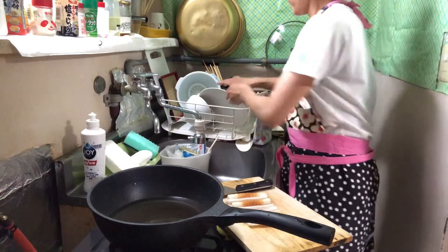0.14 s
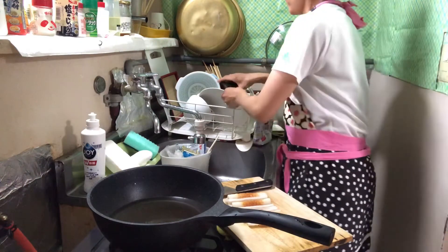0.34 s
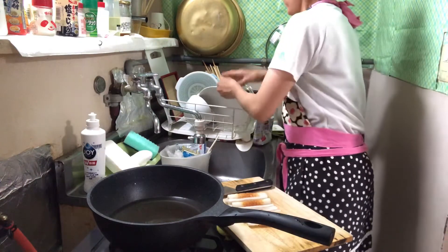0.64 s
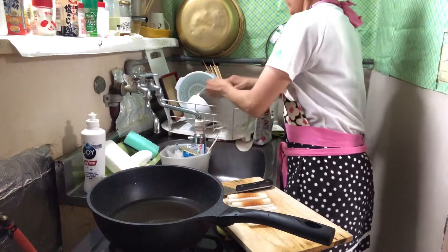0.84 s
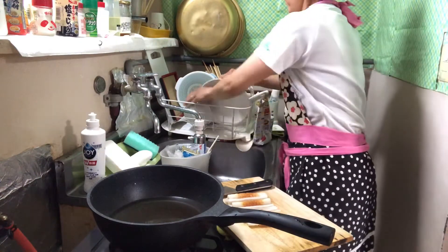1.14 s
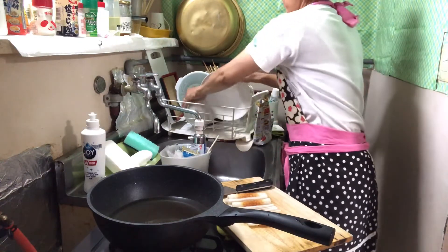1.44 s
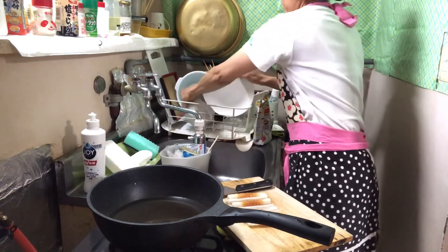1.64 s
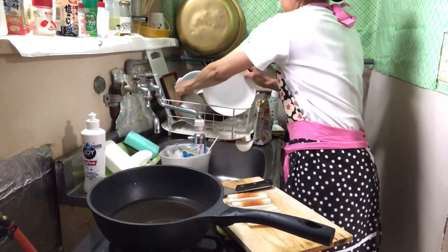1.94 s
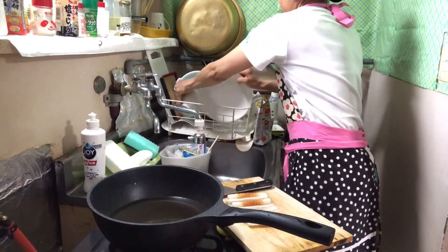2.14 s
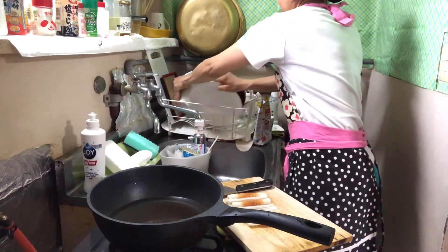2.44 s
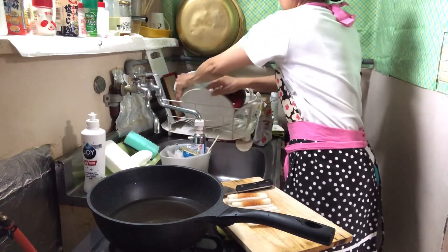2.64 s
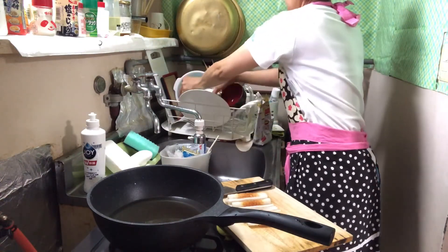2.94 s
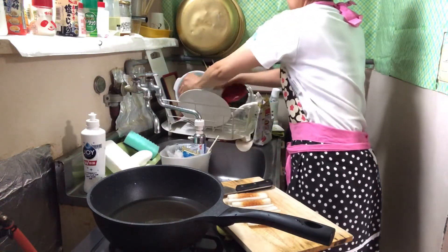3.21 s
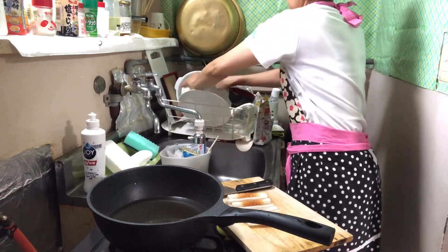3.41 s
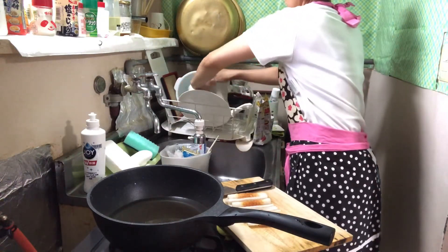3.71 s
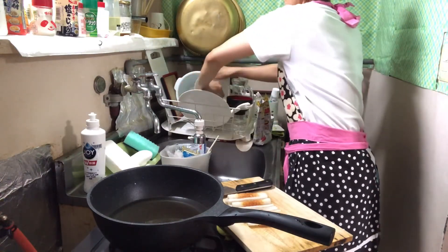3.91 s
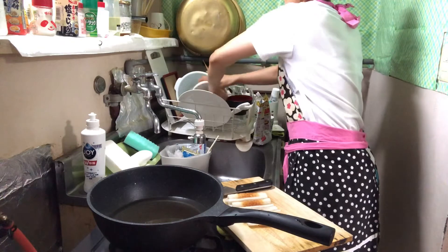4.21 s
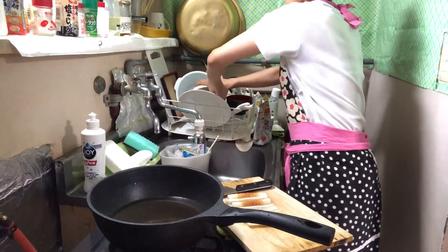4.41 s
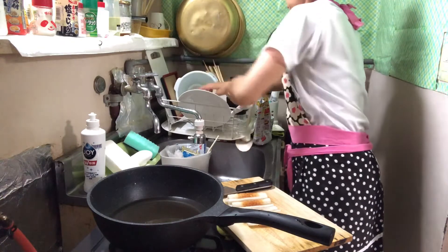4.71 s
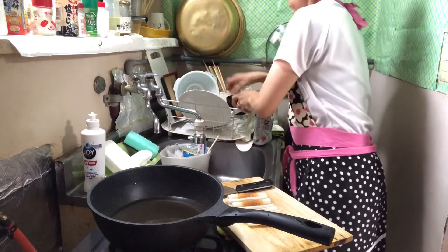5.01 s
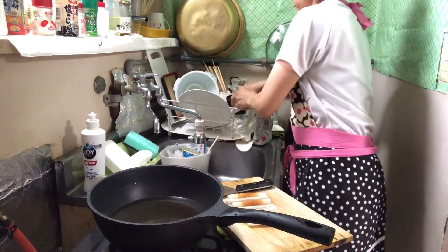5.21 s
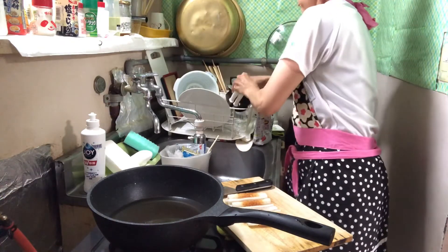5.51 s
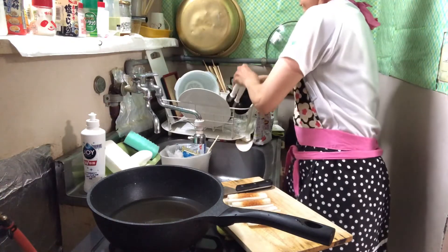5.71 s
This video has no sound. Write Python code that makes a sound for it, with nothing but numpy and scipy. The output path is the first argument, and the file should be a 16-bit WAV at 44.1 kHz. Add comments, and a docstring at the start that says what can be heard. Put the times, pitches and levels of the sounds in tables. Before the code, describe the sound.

Crockery clatters and clinks in a wire drying rack as someone rummages, with rim scrapes, sink thuds and a faint kitchen hum.

```python
"""A faint wavering hum and soft room noise, then knocks: someone rummages through a wire drying rack.
Each knock rings the struck piece (decaying sine modes) and rattles the stack (a noisy chord of chance modes).
Rims scrape between the knocks (random slips through broad resonances), catching now and then.
Knocks and bumps thud on the steel sink (resonant noise); close kitchen walls smear knocks and scrapes."""
import sys
import numpy as np
from scipy import signal
from scipy.fft import rfft, irfft, next_fast_len
from scipy.io import wavfile
from scipy.ndimage import uniform_filter1d

SR = 44100
rng = np.random.default_rng(int(sys.argv[2]) if len(sys.argv) > 2 else 0)


def file_out(sig):
    """Save sig as 16-bit WAV at sys.argv[1]."""
    # one column per channel
    cols = np.atleast_2d(sig).T
    # limit, then scale
    lim = np.clip(cols, -1, 1)
    pcm = np.round(lim * 32767).astype(np.int16)
    wavfile.write(sys.argv[1], SR, pcm)


N = 258008
TIME = np.arange(N) / SR
AGE = np.arange(24000) / SR  # seconds since a contact
BODY_HZ, EDGE_HZ, TOP_HZ = 1400, 6000, 15900
STROKE_ATTACK_S, STROKE_RELEASE_T60_S = 0.018, 0.18
SOFT_TOUCH = 0.07  # dB of longer build-up for each dB that a knock is lighter
CHOKE_S = 0.11  # a piece struck again within about this time is pressed on its neighbour and rings less
# how the contact point favours mode clusters [dB], cluster width [Hz]; single modes, +/- this [dB]
PATCHY_DB, PATCH_HZ, FAVOUR_DB = 3.2, 130, 7
STACK_LAG_S = .0022  # time for a shock to spread through the stack

# room noise spectrum: (frequency [Hz], relative level per Hz [dB])
AIR = [(24, -58.5), (40, -17), (75, -14.5), (109, -4.5), (144, -11), (180, -3), (231, -14), (455, -9.5),
       (751, -24.5), (1020, -20.5), (1440, -27.5), (4800, -35), (16000, -53.5)]

# knocks on each kind of piece; body (below 1.4 kHz) and edge (above 6 kHz) are relative to the clink between:
# (time [s], relative level [dB], body [dB], edge [dB], rattle t60 [s])
CUP_KNOCKS = [(.1288, -44.5, -8, -20, 0.1), (.4594, -37.5, 4, -6.5, 0.27), (.4969, -25, -2, -10, 0.11),
              (.6674, -23.5, -3.5, -13.5, 0.38), (.6854, -23.5, 4.5, -14, 0.21),
              (.7196, -11.5, -4.5, -18, 0.32), (.7454, -9, -13.5, -11.5, 0.091), (.832, -25, -6, -32, .37),
              (.8716, -19, -4, -16, 0.3), (.8943, -13, -7, -16.5, 0.18), (2.4992, -13, -5.5, -5.5, 0.35),
              (2.526, -9.5, -5.5, -16, 0.1), (2.6685, -3.5, -19, -6, 0.16), (2.725, 0, -12.5, -8.5, .23),
              (3.3965, -10, -4.5, -10.5, 0.29), (3.4092, 1, -11, -10.5, 0.15), (3.484, 1, -11, -19, 0.1),
              (3.4983, -3, -3, -10.5, .16), (3.5961, -18.5, -2, -15.5, 0.1),
              (3.7409, -8, -6.5, -17.5, 0.091), (3.8052, -28.5, -24, -9.5, 0.21),
              (4.0097, -20.5, -2, -29, 0.11), (4.0492, -21, -7, -17, 0.29),
              (4.2583, -13.5, -14.5, -20.5, 0.15), (4.3313, -16, -9.5, -13.5, 0.52),
              (4.7184, -23.5, -16, -6.5, 0.25), (5.2722, -28.5, -12, -16.5, 0.27),
              (5.3552, -38, -15, -5, 0.22), (5.6342, -20.5, 6, -12, 0.19), (5.6474, -19, 9, -12, 0.079)]
RACK_KNOCKS = [(.6016, -35.5, 0.5, -21, 0.2), (1.0654, -34, 2, -12, 0.065), (1.0751, -23, 7.5, -27, .21),
               (1.0952, -21, -16, -11.5, 0.13), (1.1994, -40.5, 13, -15, 0.37),
               (1.3094, -48.5, 21.5, -26, 0.061), (1.49, -23.5, 9.5, -23, 0.023),
               (1.5369, -30, 8.5, -34, 0.34), (2.3492, -32.5, -1.5, -22, 0.45),
               (2.9204, -20, -3, -18.5, 0.3), (3.036, -15, -3.5, -22, 0.12),
               (3.2623, -30.5, -3, -7.5, 0.58), (3.3074, -27.5, -1, -18, 0.15),
               (3.8695, -24.5, -2.5, -40, 0.08), (3.945, -39, 11, -34, 0.46), (4.5676, -17, -10, -17, 0.18)]
PLATE_KNOCKS = [(1.2436, -31, 12, -29, 0.21), (1.2734, -27.5, 7.5, -21, 0.049),
                (1.4242, -18.5, 1.5, -20, 0.28), (1.5989, -2, -13.5, -10.5, 0.14),
                (1.6551, -7.5, -14, -13, 0.15), (1.6721, -14, -13, -16, 0.082),
                (1.7124, -16.5, -7.5, -10.5, 0.82), (1.7606, -2.5, -5, -13, 0.088),
                (1.7893, 1, -13, -19.5, 0.09), (1.805, -4, -6, -12, 0.17), (1.934, -24, -9.5, -8, .2),
                (1.9565, -10, -13, -11, 0.13), (2.1163, -29, 0.5, -18, 0.56),
                (2.148, -15, -10.5, -14, 0.15), (2.158, -4.5, -6.5, -11, 0.052),
                (2.174, -16, 0.5, -12, 0.034), (3.1294, -21, -5, -10, 0.34)]
GLASS_KNOCKS = [(3.5961, -16, 1.6, -12, .07)]
BOWL_KNOCKS = [(4.3554, -12.5, -1.5, -24.5, 0.19), (4.366, -5.5, -13.5, -18, 0.44),
               (4.3829, -4.5, -3.5, -2.5, 0.16), (4.3968, -2.5, -25, -6, 0.1),
               (4.4144, -6.5, -23.5, -11.5, 0.22), (4.4354, -1, -8, -11.5, 0.17),
               (4.452, -14, -5, -12, 0.06), (4.5118, -16, -3.5, -18, 0.14)]
DISH_KNOCKS = [(4.5851, -5.5, -2.5, -15, 0.18), (4.6079, -12.5, -1, -22, 0.16),
               (5.0498, -18, 2.5, -21, 0.2), (5.7249, -26, 3, -12, 0.41), (5.7956, -13.5, -2, -16.5, 0.15)]
SAUCER_KNOCKS = [(5.2445, -36.5, 5, -17, 0.21), (5.3314, -29.5, -6, -20, 0.35),
                 (5.4274, -28.5, 7, -28, 0.72), (5.4615, -19, -4, -19, 0.18), (5.502, -22.5, 5, -17, .07),
                 (5.5294, -21.5, -18, -14, 0.092), (5.5727, -23.5, 2, -15, 0.38),
                 (5.7555, -24.5, 9.5, -13, 0.12)]

# ringing modes of each piece: (frequency [Hz], relative level [dB], t60 [s])
CUP = [(1003, 6, 0.17), (1216.5, 3.5, 0.1), (1750, 4, 0.13), (2919, 17, 0.028), (3665, 10.5, 0.051),
       (4060, -7, 0.17), (4080, -9, 0.15), (4610, -7, 0.053), (4830, -1.5, 0.095), (5363, 6, 0.029),
       (6700, -10, 0.059), (7360, -8, 0.1), (8470, -29, .14), (9120, -19.5, 0.15), (9600, -16, 0.05),
       (11300, -25.5, 0.12), (12400, -22, 0.15), (13840, -22.5, .2)]
RACK = [(646, -16, 0.17), (790, -13, 0.21), (963, -9, 0.15), (1004, 2.5, 0.099), (1032, -7.5, 0.067),
        (1099.5, 0, 0.14), (1250, -5.5, 0.071), (1780, -8.5, 0.11), (1874, -1, 0.031), (2025, -22.5, 0.5),
        (2950, -8, 0.14), (4080, -10, 0.048), (5080, -23, 0.086), (6480, -40, 0.056), (7020, -19.5, 0.19),
        (9950, -30, 0.41), (11300, -32.5, 0.17)]
PLATE = [(595.6, -1, 0.097), (772, -9.5, 0.21), (1027.4, 6, 0.063), (1769, -4.5, 0.11), (2957, -0.5, 0.082),
         (3366, 1, 0.039), (4530, -15, .11), (4610, -1, .07), (6010, 3, 0.044), (6630, -8, 0.089),
         (7470, -5, .11), (9250, -17, .12), (9717, -24, 0.097), (11560, -29, .1), (13100, -27, 0.11)]
GLASS = [(576, -5.5, .09), (1166, 1, 0.11), (1820, -19, 0.16), (3250, 0, 0.07), (5750, -25, .2),
         (7100, -17, 0.22), (9800, -19, .12), (11900, -20, .12), (14260, -12, .12)]
BOWL = [(1050, -2, .22), (2928, 0, .24), (4578, -11, .25), (5216, 0, .17), (7472, -16, .18),
        (7957, -6, .17), (9232, -14, .18), (11267, -23, .15), (11854, -19, .14), (13049, -18, .15),
        (13948, -19, .15)]
DISH = [(965, -4, 0.058), (1039, 1, 0.063), (1176, -2.5, 0.071), (1681, -2, 0.076), (1902, -3.5, 0.05),
        (3180, -5, 0.053), (4760, -16, 0.23), (6385, -26, 0.09), (7220, -16, 0.25), (9940, -18, 0.16),
        (11920, -16, 0.18), (12560, -27, .15)]
SAUCER = [(738, -2, 0.16), (1030, 9, 0.055), (1138, 12.5, 0.061), (1250, 4.5, 0.098), (1665, 3, 0.046),
          (2932, -10, 0.26), (3460, -2.5, 0.1), (3397, -22, 0.11), (4930, -5, 0.41), (6196, -29, .15),
          (6988, -25, 0.18), (7370, -11, 0.31), (10200, -20, 0.14), (12565, -25, .18)]

# broad resonances of the stacked crockery: (frequency [Hz], width [Hz], relative level [dB])
STACK = [(510, 133, -1.5), (555, 22, -2), (868, 650, -1.5), (1070, 300, -2.5), (1225, 63, -17.5),
         (1940, 454, 0.5), (2500, 140, -7.5), (3013, 470, -0.5), (3376, 260, -8.5), (3920, 170, -4.5),
         (4560, 650, -5.5), (5130, 1030, -9.5), (6120, 480, -12.5), (6775, 220, -6), (7890, 450, -14),
         (10030, 970, -20.5), (11520, 180, -19), (13040, 450, -23.5), (15340, 2100, -31)]
# resonances of the steel sink: (frequency [Hz], width [Hz], relative level [dB])
SINK = [(60, 29, -11), (86.6, 30, -12.5), (125, 63, -12.5), (192, 73, -4.5), (268, 7.2, 3.5),
        (328, 110, -4.5), (397.7, 12.3, 10), (488, 75, -1), (580, 56, -3.5)]
# plate rubbed while fingers damp it: (frequency [Hz], width [Hz], relative level [dB])
PLATE_RUB = [(585, 47, 4.5), (816, 220, -11.5), (1010, 144, -4), (1188, 190, -9), (1825, 810, -8.5),
             (2350, 300, -16), (2930, 92, -17), (3180, 180, -9), (4530, 760, -16), (6000, 200, -12.5),
             (6970, 360, -20.5), (7100, 1000, -22.5), (9500, 1100, -32.5), (13100, 3500, -35)]
# saucer rubbed while fingers damp it: (frequency [Hz], width [Hz], relative level [dB])
SAUCER_RUB = [(413, 140, -11), (706, 77, -9), (1090, 390, -15), (1770, 780, -19), (2900, 220, -12),
              (3500, 2400, -5.5), (5100, 220, 1), (6230, 800, -21), (7700, 760, -6.5), (10300, 1500, -30),
              (13000, 3500, -29)]

# one rim sliding over another: (start [s], length [s], relative level [dB], relative gritty treble [dB])
PLATE_STROKES = [(.69, 0.25, -25, -31.5), (1.23, .27, -25, -42), (1.61, 0.45, -26, -39),
                 (2.5, 0.32, -29.5, -38.5), (2.96, .15, -30, -38.5), (3.28, 0.33, -28.5, -40),
                 (3.66, 0.5, -44.5, -46), (4.33, 0.093, -38.5, -19), (4.75, 0.074, -33.5, -43)]
SAUCER_STROKES = [(5.36, 0.24, -30, -44.5), (5.62, 0.05, -42, -17.5), (5.7, 0.2, -31.5, -42)]
# the whole rack rocks and lands on the sink: (time [s], relative level [dB])
BUMPS = [(.898, -30.5), (1.088, -29.5), (2.521, -23), (2.677, -17.5), (2.75, -18), (3.406, -23),
         (4.731, -27.5), (5.572, -27.5), (5.644, -26)]


def undb(db):
    """Decibels to amplitude gain."""
    return 10 ** (np.asarray(db) / 20)


def unit(x):
    """Scale to rms 1."""
    return x / np.sqrt(np.mean(x ** 2))


def loudest(x, size):
    """Rms of the loudest stretch of size samples."""
    return np.sqrt(uniform_filter1d(x ** 2, size).max())


def fade(t60):
    """Exponential decay: 60 dB in t60 seconds, at least 5 ms."""
    return np.exp(-np.log(1000) * AGE / max(t60, .005))


def add(out, s, x):
    """Mix x in at time s."""
    i = max(int(s * SR), 0)
    out[i:i + len(x)] += x[:max(N - i, 0)]


def shape(x, gain):
    """Filter by a gain given as a function of frequency."""
    n = np.shape(x)[-1]
    return irfft(rfft(x) * gain(np.fft.rfftfreq(n, 1 / SR)), n)


def resonate(x, peaks):
    """Colour a noise with steep-sided resonances (Hz, width Hz, dB)."""
    def gain(f):
        total = 0
        for hz, width_hz, db in peaks:
            damping = (f * width_hz) ** 2
            total = total + undb(db) * damping / (damping + (f * f - hz * hz) ** 2)
        return total
    return shape(x, gain)


def cut(x, hz, kind, order=4):
    """Butterworth filter."""
    return signal.sosfilt(signal.butter(order, hz, kind, fs=SR, output="sos"), x)


def kitchen(hum_hz=176, hum_db=-54, waver=0.27, air_db=-44.5):
    """Shaped room noise, and an appliance hum with slow random phase and level drift."""
    hz, db = np.transpose(AIR)
    noise = rng.standard_normal(N)
    air = shape(noise, lambda f: undb(np.interp(np.log(f + 1), np.log(hz), db)))
    drift = unit(cut(rng.standard_normal(N), 8.9, "lowpass", order=2))
    hum = np.sin(2 * np.pi * hum_hz * TIME + waver * drift) * (1 + waver * drift)
    return undb(air_db) * unit(air) + undb(hum_db) * unit(hum)


def chime(modes, scatter_db, grip, split=0.00694, twin_db=-6):
    """One strike's free ring: the contact point favours some modes, the grip detunes by up to +/- grip."""
    # no dish is perfectly round: each mode has a close, weaker twin that beats with it
    twins = [(hz * (1 + split * (-1) ** k), db + twin_db, t60) for k, (hz, db, t60) in enumerate(modes)]
    hz, db, t60 = np.transpose(list(modes) + twins)
    favour, detune, phase = rng.random((3, len(hz))) - .5
    turns = np.outer(hz * (1 + 2 * grip * detune), AGE) + phase[:, None]
    decay = np.exp(np.outer(-np.log(1000) / t60, AGE).astype(np.float32))
    rings = decay * np.sin((2 * np.pi * turns).astype(np.float32))
    return undb(db + 2 * scatter_db * favour) @ rings


def neighbours(count, spacing_hz=60, hiss=0.87):
    """Per knock, a chance chord of many small modes of the touched pieces and wires, plus noise."""
    chance = rng.random((count, 4, len(AGE) // 2 + 1))
    awake = chance[:, 0] < SR / len(AGE) / spacing_hz
    strength = np.sqrt(-np.log(1 - chance[:, 1]))
    chord = irfft(awake * strength * np.exp(2j * np.pi * chance[:, 2]))
    # modes cluster, and each contact point favours different clusters
    size = int(PATCH_HZ * len(AGE) / SR)
    patches = uniform_filter1d(uniform_filter1d(chance[:, 3] - .5, size), size)
    favour = undb(PATCHY_DB * unit(patches))
    shaken = unit(chord) + hiss * rng.standard_normal(chord.shape)
    return unit(resonate(irfft(rfft(shaken) * favour), STACK))


def chatter(blow, bounce_db, count=4, gap_s=0.0083, loss_db=4.5):
    """Hard pieces never meet just once: weaker contacts follow at uneven gaps."""
    out = blow.copy()
    gaps_s = gap_s * (.5 + rng.random(count))
    lags = (np.cumsum(gaps_s) * SR).astype(int) + 1
    for k, lag in enumerate(lags):
        out[lag:] += undb(bounce_db - loss_db * k) * blow[:-lag]
    return out


def knocks(table, modes, ring_db, build_s, scatter_db, walls_db, bounce_db, level_db, body_db, edge_db, grip,
           choke_db=2, tail_db=-9, tail_t60=0.14, edge_t60=1.0):
    """Each contact rings one piece and shakes the stack; the kind of contact sets its body and edge."""
    blows = []
    rests_s = np.diff([row[0] for row in table], prepend=-1)
    for (_, db, _, _, t60), rest_s, rattle in zip(table, rests_s, neighbours(len(table))):
        # a light, glancing contact builds up more slowly than a firm one
        rise = 1 - np.exp(-AGE / (build_s * undb(-SOFT_TOUCH * db)))
        spread = rise * (fade(t60) + undb(tail_db) * fade(tail_t60))
        ring = rise * chime(modes, scatter_db, grip)
        # the neighbouring dishes and the corner scatter the ring
        echoes = spread * rng.standard_normal(len(AGE))
        echoes = echoes / np.linalg.norm(echoes)
        ring = ring + undb(walls_db) * signal.fftconvolve(ring, echoes)[:len(AGE)]
        clear = undb(ring_db - choke_db * np.exp(-rest_s / CHOKE_S))
        # the shock takes a moment to travel through the stack
        shaken = rattle * spread * (1 - np.exp(-AGE / STACK_LAG_S))
        blow = shaken + clear * ring / loudest(ring, size=400)
        blows.append(chatter(blow, bounce_db))
    body = cut(blows, [420, BODY_HZ], "bandpass")
    clink = cut(blows, [BODY_HZ, EDGE_HZ], "bandpass", order=5)
    # touching pieces damp each other's highest modes first
    edge = cut(blows, EDGE_HZ, "highpass", order=5) * fade(edge_t60)
    out = np.zeros(N)
    for (s, db, low_db, high_db, _), *bands in zip(table, body, clink, edge):
        gains = undb(level_db + db + np.array([body_db + low_db, 0, edge_db + high_db]))
        add(out, s, sum(gain * band / loudest(band, size=600) for gain, band in zip(gains, bands)))
    return out


def cups():
    """Struck cups: a strong, briefly ringing mode near 2.9 kHz over longer, weaker ones."""
    return knocks(CUP_KNOCKS, CUP, ring_db=-2, build_s=0.00097, scatter_db=FAVOUR_DB, walls_db=-3.5,
                  bounce_db=-17.5, level_db=-10.5, body_db=5.0, edge_db=8.0, grip=0.012)


def room(x, low_db=-15, low_t60=0.65, high_db=-19, high_t60=0.11):
    """Decaying-noise reverberation: the small kitchen holds the middle range longer than the treble."""
    build = 1 - np.exp(-AGE / 0.0015)
    low = fade(low_t60) * build * rng.standard_normal(len(AGE))
    high = fade(high_t60) * build * rng.standard_normal(len(AGE))
    tail = undb(low_db) * cut(low / np.linalg.norm(low), BODY_HZ, "lowpass", order=2)
    tail += undb(high_db) * cut(high / np.linalg.norm(high), BODY_HZ, "highpass", order=2)
    return x + signal.fftconvolve(x, tail)[:N]


def weight(table, level_db, follow=0.5):
    """The load down the rack's feet grows with each knock, by follow dB per dB; rows (s, dB)."""
    return [(s, level_db + follow * db) for s, db, *_ in table]


def thuds(loads, level_db, deep_db, t60, rise_s=0.0054, top_hz=720):
    """The sink takes up each load and booms briefly: resonant noise under summed power envelopes."""
    power = np.zeros(N)
    for s, db in loads:
        push = undb(db) * (1 - np.exp(-AGE / rise_s)) * fade(t60)
        add(power, s, push ** 2)
    boom = resonate(rng.standard_normal(next_fast_len(N)), SINK)[:N]
    knock = cut(boom, [190, top_hz], "bandpass")
    deep = cut(boom, [60, 190], "bandpass", order=3)
    return undb(level_db) * np.sqrt(power) * (unit(knock) + undb(deep_db) * unit(deep))


def sink():
    """The steel sink under the rack answers the knocks and the heavier bumps."""
    loads = weight(CUP_KNOCKS, level_db=-20.5) + weight(PLATE_KNOCKS, level_db=-22)
    loads += weight(BOWL_KNOCKS, level_db=-24) + weight(RACK_KNOCKS + DISH_KNOCKS, level_db=-20)
    answers = thuds(loads, level_db=-6, deep_db=-12, t60=0.43)
    return answers + thuds(BUMPS, level_db=-4, deep_db=-2, t60=0.38)


def rack():
    """Struck rack: many modes, widely scattered in level and detuned from knock to knock."""
    return knocks(RACK_KNOCKS, RACK, ring_db=1, build_s=0.0014, scatter_db=8.5, walls_db=-13.5,
                  bounce_db=-15, level_db=-10.0, body_db=8, edge_db=6.0, grip=0.023)


def stroke(length_s):
    """Pressure of one slide: it builds, holds and dies away."""
    age_s = np.arange(max(int(length_s * SR), 1)) / SR
    held = np.minimum(age_s / STROKE_ATTACK_S, 1)
    return np.concatenate([held, held[-1] * fade(STROKE_RELEASE_T60_S)])


def scrapes(strokes, peaks, slips_per_s, body_db, grit_db, smear_t60=0.11):
    """Glazed rims stick and slip: tiny uneven ticks, smeared, into the sliding piece's resonances."""
    low, high = np.zeros((2, N))
    for s, length_s, db, treble_db in strokes:
        add(low, s, undb(body_db + db) * stroke(length_s))
        add(high, s, undb(grit_db + treble_db) * stroke(length_s))
    happens = rng.random(N) < slips_per_s / SR
    slips = happens * undb(2 * np.minimum(rng.exponential(size=N), 3))
    smear = fade(smear_t60) * rng.standard_normal(len(AGE))
    slips = signal.fftconvolve(slips, smear)[:next_fast_len(N)]
    rub = resonate(slips, peaks)[:N]
    body = unit(cut(rub, [380, 1600], "bandpass", order=3))
    grit = unit(cut(rub, 1624, "highpass"))
    return low * body + high * grit


def jostles(strokes, count=2, spread_db=3, t60=0.056):
    """A sliding rim catches at chance moments, harder in a firmer stroke; gives rows of knocks."""
    rows = []
    for s, length_s, db, _ in strokes:
        for when, force in rng.random((count, 2)):
            rows.append((s + length_s * when, db + spread_db * (2 * force - 1), 0, 0, t60))
    return sorted(rows)


def sliding():
    """Plates and a saucer scrape along their neighbours; the plates ring whenever they catch."""
    rubs = scrapes(PLATE_STROKES, PLATE_RUB, slips_per_s=360, body_db=-6.5, grit_db=-5)
    rubs += scrapes(SAUCER_STROKES, SAUCER_RUB, slips_per_s=160, body_db=-6.5, grit_db=-5)
    catches = knocks(jostles(PLATE_STROKES), PLATE, ring_db=2, build_s=.003, scatter_db=12.0, walls_db=-7,
                     bounce_db=-14.5, level_db=-17.5, body_db=8, edge_db=-13, grip=0.006)
    return rubs + catches


def plates():
    """Struck plates: strong bounces, and much less ring when struck again soon."""
    return knocks(PLATE_KNOCKS, PLATE, ring_db=3, choke_db=13.5, build_s=0.0013, scatter_db=4.0, walls_db=-4.5,
                  bounce_db=-7.5, level_db=-11, body_db=6.0, edge_db=5, grip=0.0054)


def glass():
    """A struck glass: its ring stands well above the rattle."""
    return knocks(GLASS_KNOCKS, GLASS, ring_db=6, build_s=0.00063, scatter_db=3.5, walls_db=-5,
                  bounce_db=-16, level_db=-9, body_db=-2, edge_db=3, grip=0.0049)


def bowl():
    """A struck bowl: long modes, hardly detuned and little scattered by the walls."""
    return knocks(BOWL_KNOCKS, BOWL, ring_db=0.5, build_s=0.00092, scatter_db=FAVOUR_DB, walls_db=-18,
                  bounce_db=-10.5, level_db=-10, body_db=5, edge_db=6, grip=0.0016)


def dish():
    """A struck dish: mode levels nearly constant from knock to knock."""
    return knocks(DISH_KNOCKS, DISH, ring_db=2, build_s=0.00073, scatter_db=-0.5, walls_db=-2.5,
                  bounce_db=-12.5, level_db=-10.0, body_db=8.5, edge_db=5.5, grip=0.0042)


def saucer():
    """A struck saucer: strong modes near 1.1 kHz, clear above the rattle."""
    return knocks(SAUCER_KNOCKS, SAUCER, ring_db=5, build_s=0.0012, scatter_db=2.5, walls_db=-5,
                  bounce_db=-10, level_db=-9.5, body_db=6, edge_db=8, grip=0.0125)


def scene():
    """Knocks and scrapes in the room, over the sink's thuds and the kitchen's hum."""
    crockery = cups() + rack() + plates() + glass() + bowl() + dish() + saucer()
    return (kitchen() + sink() + room(crockery + sliding()))[None]


def record(dry):
    """The microphone rounds the loudest peaks and loses the very top."""
    rounded = dry / (1 + dry ** 4) ** (1 / 4)
    return signal.sosfilt(signal.ellip(10, .2, 70, TOP_HZ, fs=SR, output="sos"), rounded)


dry = scene()
out = record(dry)
file_out(out)
```